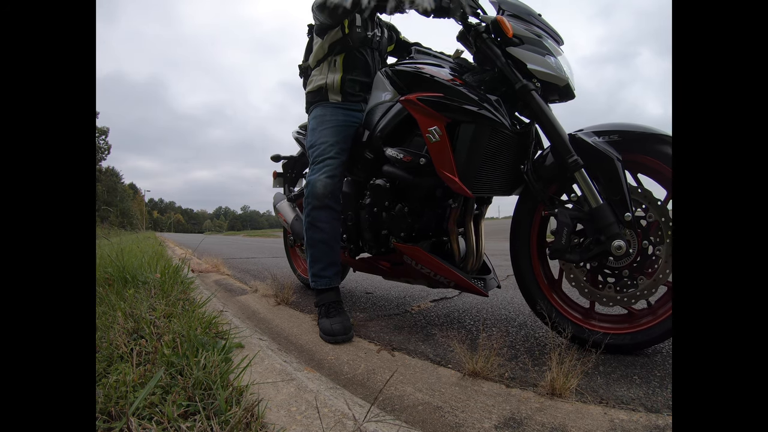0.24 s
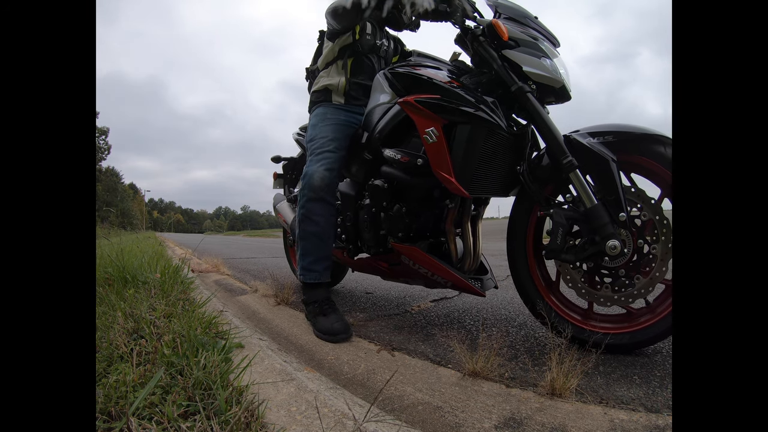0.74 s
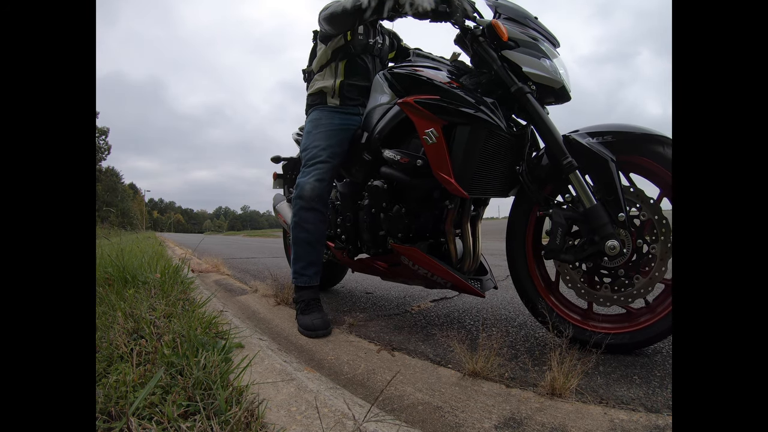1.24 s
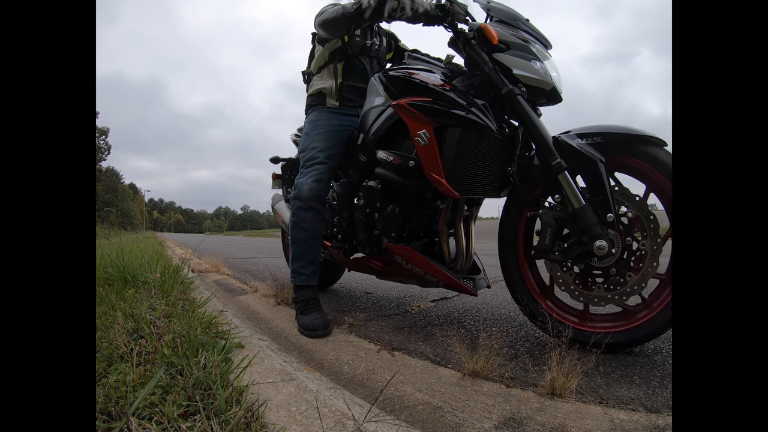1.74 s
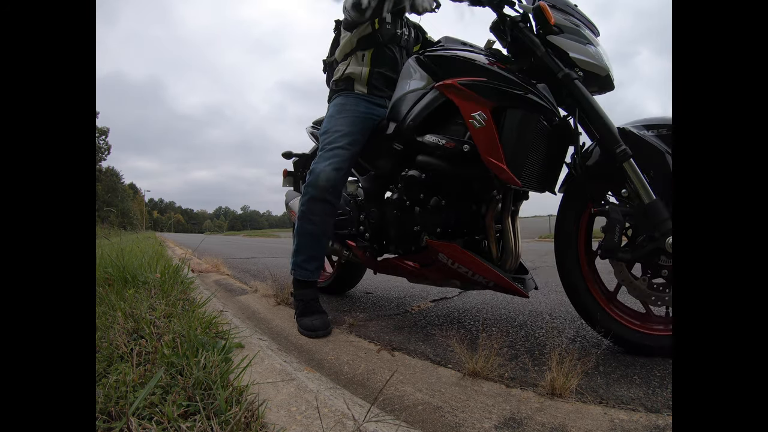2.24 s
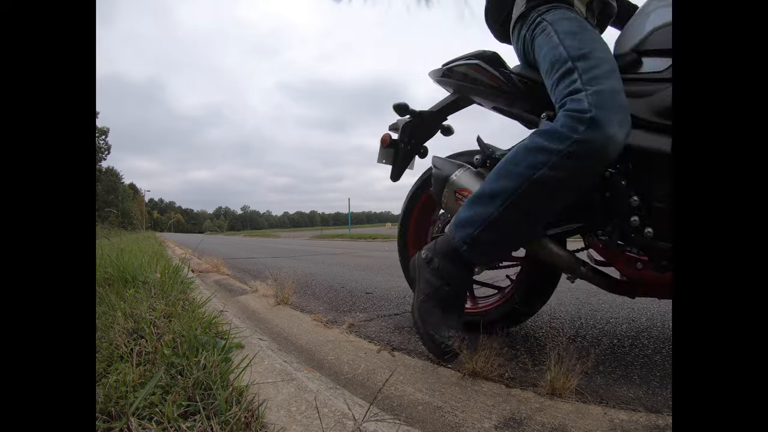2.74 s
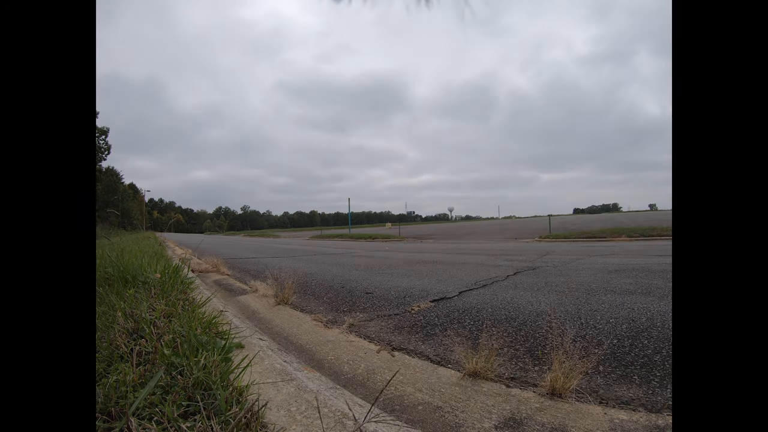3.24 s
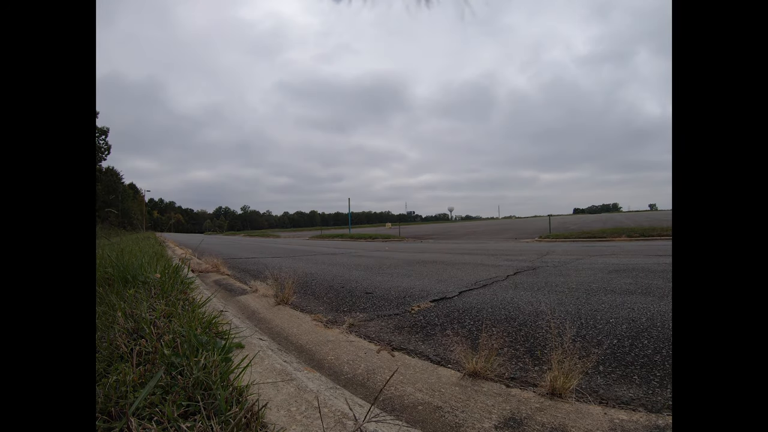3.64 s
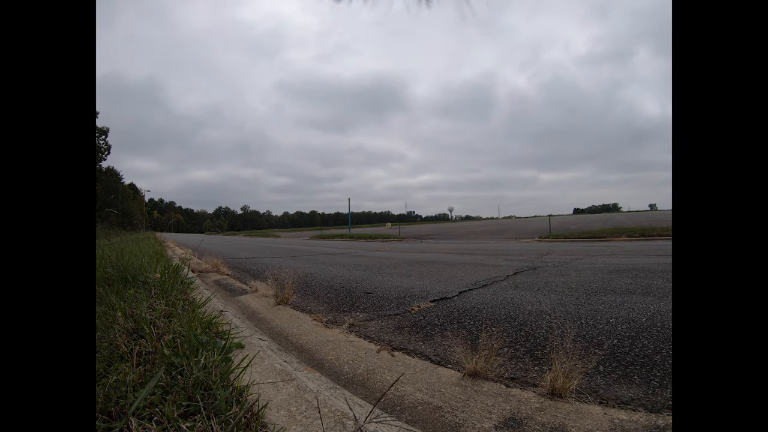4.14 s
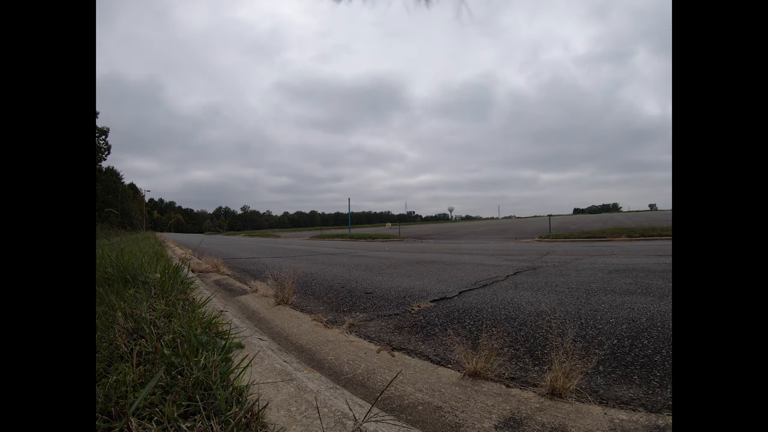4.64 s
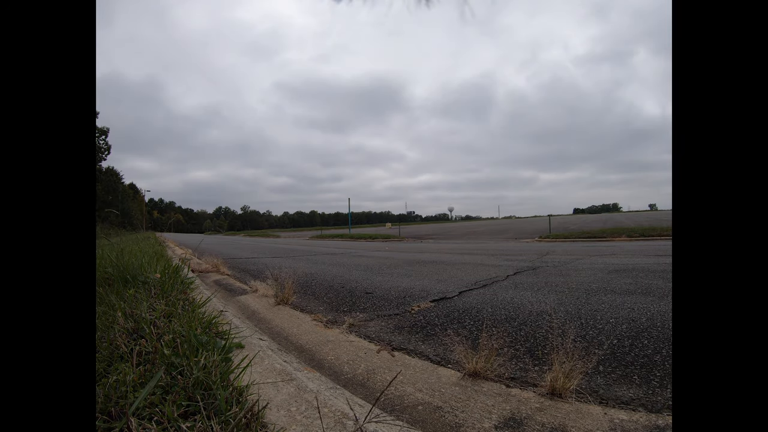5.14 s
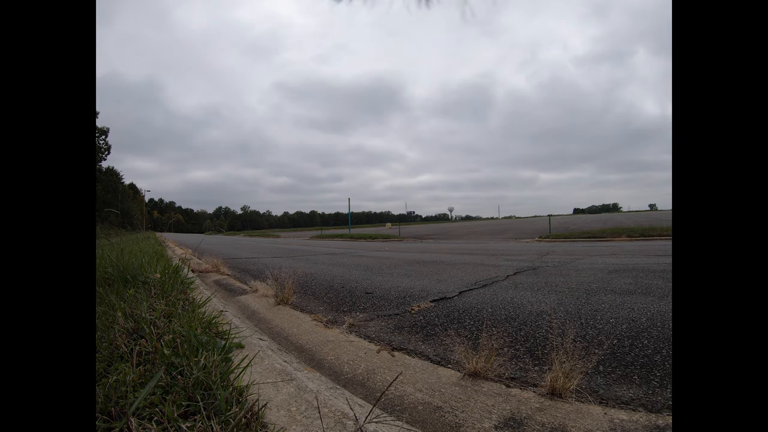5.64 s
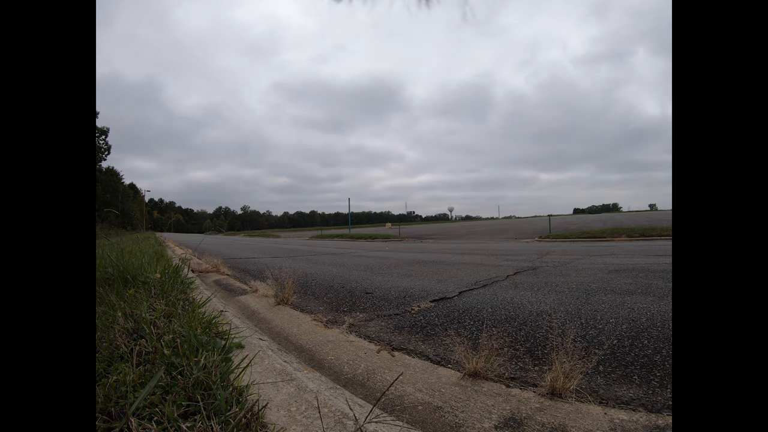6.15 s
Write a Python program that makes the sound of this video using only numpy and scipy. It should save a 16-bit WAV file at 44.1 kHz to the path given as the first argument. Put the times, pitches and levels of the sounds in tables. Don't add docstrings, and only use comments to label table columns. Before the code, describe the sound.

Outdoors beside an open road, a four-cylinder motorcycle idles very close to the microphone. A hard steel clunk drops it into gear, two quick throttle blips bark, and revs sag lumpily. It then growls away past the microphone with rasp and mechanical clatter, suddenly thins, dips in pitch, and climbs again in the distance while wind bumps the microphone.

```python
import sys
import numpy as np
from scipy import signal
from scipy.fft import rfft, irfft, next_fast_len
from scipy.io import wavfile
from scipy.ndimage import map_coordinates

SR = 44100
rng = np.random.default_rng(int(sys.argv[2]) if len(sys.argv) > 2 else 0)


def generate_wav(sig):
    pcm = np.round(np.clip(np.atleast_2d(sig).T, -1, 1) * 32767).astype(np.int16)
    wavfile.write(sys.argv[1], SR, pcm)


def amplitude_ratio(level_db):
    exponent = np.asarray(level_db, float) / 20
    return 10 ** exponent


N = 282620
STEP = 4


def unit(x):
    return x / np.sqrt(np.mean(x ** 2) + 1e-20)


def along(points, hz):
    f, v = np.transpose(points)
    return np.interp(np.log(hz + 1), np.log(f + 1), v)


def curves(rows):
    s, *cols = np.transpose(rows)
    return [np.interp(np.arange(N) / SR, s, c) for c in cols]


def wobble(rate, size=N):
    coarse = np.arange(N // 32 + 1) * 32 / SR
    knots = rng.standard_normal(int(N * rate / SR) + 4)
    smooth = map_coordinates(knots, [coarse * rate], order=2)
    return np.interp(np.arange(size) / size * N / SR, coarse, smooth)


def filtered(x, response):
    m = next_fast_len(N + SR // 2)
    return irfft(rfft(x, m) * response(np.fft.rfftfreq(m, 1 / SR)), m)[:N]


def hiss(response, lo_hz, hi_hz):
    x = filtered(rng.standard_normal(N), response)
    return x / np.std(filtered(x, lambda hz: (hz > lo_hz) & (hz < hi_hz)))


# (t/s, firing rate f/Hz, loudness level/dB, bite of upper orders level/dB, mechanical effort level/dB)
BLIP_STATES = [(0, 40.3, -5, -45.5, -32.5), (.316, 39.97, -4, -44.5, -31), (.36, 64.7, 2, -31, -27),
               (.40, 109.8, 4.5, -19, -31), (.46, 147, -2, -22.5, -29.5), (.548, 124.2, 1, -26, -30),
               (.61, 193.2, 5, -4, -26.5), (.685, 245.7, 1.5, -13, -26), (1.02, 136, -2, -34.5, -33.5)]
RIDE_STATES = [(1.16, 106, -3, -40, -36), (1.34, 76.99, -4, -37.5, -38.5), (1.55, 75, -5, -34, -35),
               (1.68, 82.1, -1, -30.5, -32.5), (1.772, 100.5, 2, -23.5, -34), (1.97, 160.9, -2.5, -17, -26),
               (2.13, 158, 1, -12.5, -26), (2.38, 164.3, 1, -14, -24.5), (2.69, 168.3, 4, -26.5, -29),
               (2.98, 154.2, 2.5, -14, -42), (3.21, 150.5, -6, -24.5, -49),
               (3.63, 143.1, -10.5, -33, -59.5), (3.76, 130.6, -12, -32, -62),
               (4.082, 105.1, -12.5, -37, -64), (4.899, 148, -17, -41.5, -66.5),
               (5.569, 188.2, -15, -35, -64.5), (6.08, 219.7, -17, -30, -64.5), (6.41, 245, -17, -20, -62)]


def engine_state():
    return curves(BLIP_STATES + RIDE_STATES)


LOCKED_S = 4.08


def tug():
    firings_per_turn, slack_s = 26.75, 5.55
    fired = np.cumsum(engine_state()[0]) / SR
    wheel = 2 * np.pi * (fired - fired[round(slack_s * SR)]) / firings_per_turn
    engaged = np.clip(1.5 * (np.arange(N) / SR - LOCKED_S), 0, 1)
    return -(np.cos(wheel) + .35 * np.cos(2 * wheel)) * engaged


def firings():
    tug_hz = 1.9
    return np.cumsum(engine_state()[0] + tug_hz * tug()) / SR + .78


# (start t/s, end t/s)
PASSING_TIMES = (2.65, 3.1)


def turned():
    return np.interp(np.arange(N) / SR, PASSING_TIMES, [0, 1])


# (t/s, delay/ms)
ROAD_BOUNCE = [(1.9, 0.98), (2.4, 0.97), (2.69, 1.544), (2.93, 1.16), (3.3, 1.014), (3.7, 0.97), (5, 1.098),
               (6.41, 0.94)]


def bounce_delay():
    return curves(ROAD_BOUNCE)[0]


# (t/s, peak level/dB, f/Hz)
THROTTLE_SNAPS = [
    (.466, -8, 75),
    (.548, -16, 70),
    (0.684, -17.5, 91.1),
    (1.35, -36, 60.1),
]


def throttle_sign(t):
    snap_s = 0.0073
    return np.prod([np.tanh((t - s) / snap_s) for s, _, _ in THROTTLE_SNAPS], axis=0)


def gulps():
    out, t = np.zeros(N + SR), np.arange(SR // 10) / SR
    for s, db, hz in THROTTLE_SNAPS:
        out[round(s * SR):][:len(t)] += amplitude_ratio(db - 60 * t / 0.035) * np.sin(2 * np.pi * hz * t)
    return out[:N]


# (t/s, level/dB)
WEAK_BURNS = [(1.24, -7), (1.335, -6), (1.445, -12), (1.524, -10)]


def misfire_gain(t):
    return amplitude_ratio(sum(db * np.exp(-((t - s) / .013) ** 2) for s, db in WEAK_BURNS))


# (f/Hz, level/dB)
SILENCER = [(120, -2), (170, 28), (260, 14.5), (380, 10), (460, 0), (560, 4.5), (650, 3.5), (820, -18.5),
            (980, -15), (1170, -21), (1450, -23.5), (2000, -32), (2800, -34.5), (4500, -59)]
# (quarter level/dB, half level/dB, three-quarter level/dB)
PART_ORDERS = [(-62, -38.5, -34.5), (-22, -12, -21.5), (-22.5, -21, -25), (-20, -8, -10.5),
               (-28.5, -13.5, -9)]
# (f/Hz, level/dB)
OPEN_COLOUR = [(40, -24.5), (80, -22), (160, -12), (210, -13), (300, -14), (500, -18.5), (640, -14.5),
               (750, -38)]
# (f/Hz, level/dB)
SHUT_COLOUR = [(80, -25), (140, -8), (240, -8), (290, -19), (440, -23), (510, -33), (620, -16), (720, -19)]
# (f/Hz, level/dB)
BEHIND_COLOUR = [(100, -14), (150, -15), (220, -15), (300, -15), (400, -16), (500, -18.5), (700, -23)]
# (firing rate f/Hz, level/dB)
IMBALANCE = [(40, -4.5), (77, -4.5), (110, -4.4), (165, -1.7), (240, -6.5)]


def exhaust():
    rate_hz, loud_db, upper_db, _ = [c[::STEP] for c in engine_state()]
    size = len(rate_hz)
    t = np.arange(size) * STEP / SR
    throttle = throttle_sign(t)
    shut, behind, delay_ms = (1 - throttle) / 2, turned()[::STEP], bounce_delay()[::STEP]
    upper_db = upper_db - 7 * shut
    colour_shift = delay_ms ** -0.82

    lumpy = (1 - shut) * np.exp(-((rate_hz - 78) / 5) ** 2)
    scatter_db, limp = .6 + 1.1 * lumpy, .26 * lumpy
    surge = np.clip(np.gradient(rate_hz, t) / 900, 0, 1) ** 2
    uneven_db = along(IMBALANCE, rate_hz) + 6 * surge
    loud_db = loud_db + 1.2 * tug()[::STEP]
    boom_db = 11 * np.clip((93 - rate_hz) / 40, 0, 1)
    bite_db = (rasp_level()[::STEP] - upper_db + 13) * .7 + 9 * surge

    def bounce_db(hz):
        share = 0.53
        interference = 2 * share * np.cos(2 * np.pi * hz * delay_ms / 1000)
        return 10 * np.log10(1 + share ** 2 + interference)

    def beside_db(hz):
        rounded_db = 6.5 * (hz / rate_hz - 1)
        return shut * (along(SHUT_COLOUR, hz) - rounded_db) + (1 - shut) * along(OPEN_COLOUR, hz)

    def lower_level(hz):
        colour_db = (1 - behind) * beside_db(hz) + behind * along(BEHIND_COLOUR, hz)
        return loud_db + colour_db + (1 - shut) * bounce_db(hz) - 3

    def upper_level(hz):
        bite = bite_db * np.clip((hz - 800) / 400, 0, 1)
        boom = boom_db * np.clip((400 - hz) / 130, 0, 1)
        return upper_db - 7.5 + along(SILENCER, colour_shift * hz) + bite + boom

    def level(order):
        return lower_level(max(order, 1) * rate_hz) if order < 4 else upper_level(order * rate_hz)

    fired = firings()[::STEP]
    luck = rng.standard_normal((int(fired[-1]) + 3, 2))
    strength, late = [map_coordinates(column, [fired], order=1) for column in luck.T]
    turn = 2 * np.pi * (fired + 0.015 * scatter_db * late)

    out, above = np.zeros(size), level(0)
    for k in range(18):
        below, above = above, level(k + 1)
        hz = (k + 1) * rate_hz
        lag = 0.29 * np.arctan((hz - 170) / 120) - 2 * np.pi * 0.002655 * np.maximum(hz - 310, 0)
        flutter_db = np.minimum((hz / 330) ** 1.5, 3.5 + 1.5 * behind) * wobble(6, size)
        burn_db = min(0.32 + 0.33 * k, 1.2) * scatter_db * strength
        out += amplitude_ratio(above + flutter_db + burn_db) * np.cos((k + 1) * turn - lag)
        for quarter, part_db in enumerate(PART_ORDERS[min(k, 4)] if k < 13 else []):
            drift = rng.uniform(0, 2 * np.pi) + .5 * wobble(3.32, size)
            swell_db = uneven_db + 2.1 * wobble(4.83, size)
            part = np.cos((k + (quarter + 1) / 4) * turn - drift)
            out += amplitude_ratio((below + above) / 2 + part_db + swell_db) * part

    push = np.clip(1.5 * throttle, -1, 1)
    push = push * (1 + limp * np.cos(turn / 2))
    push = push * misfire_gain(t)
    return signal.resample_poly(np.sqrt(2) * out * push, STEP, 1)[:N]


def rasp_level():
    rate_hz, _, _, effort_db = engine_state()
    behind_db = 11 + 11.5 * np.log2(rate_hz / 145)
    return effort_db + 0.83 + turned() * behind_db


# (f/Hz, density level/dB per Hz)
RASP_COLOUR = [(60, -63), (150, -22), (400, -3.5), (750, -2), (1100, -12), (1800, -8.5), (3000, -26),
               (6000, -22.5)]


def gas_rasp():
    def colour(hz):
        high_pass = hz ** 4 / (hz ** 4 + 150 ** 4)
        return amplitude_ratio(along(RASP_COLOUR, hz)) * high_pass / (1 + (hz / 9000) ** 4)

    puffs = unit(1 + 0.19 * np.cos(2 * np.pi * firings()))
    return amplitude_ratio(rasp_level() - 7 + 0.7 * wobble(17)) * hiss(colour, 686, 3000) * puffs


# (f/Hz, density level/dB per Hz)
CLATTER_COLOUR = [(590, -34), (1000, -16), (1320, 1.5), (1500, -6.5), (2070, -5.5), (2550, -4),
                  (5650, -12.5), (7290, -16), (8870, -15.5), (15800, -30)]
# (f/Hz, width/Hz, level/dB)
CASE_MODES = [(1415, 24, 7.5), (2210, 160, 3), (3590, 120, 4.5), (5700, 900, 5), (8660, 120, 10),
              (9200, 130, 3)]
# (teeth per firing, level/dB)
GEAR_MESHES = [(6.2, -19), (8.5, -15), (11.5, -18), (13, -18), (21.5, -10)]


def clatter():
    def cases(hz):
        modes = sum((amplitude_ratio(db) - 1) / (1 + (2 * (hz - c) / w) ** 2) for c, w, db in CASE_MODES)
        return amplitude_ratio(along(CLATTER_COLOUR, hz)) * (1 + modes)

    near = hiss(cases, 2780, 8600)
    far = hiss(lambda hz: cases(hz) / (1 + (hz / 7000) ** 6), 2500, 9000)
    fired = firings()
    tick_db_scale = 0.72 * np.cos(4 * np.pi * fired - 1.1)
    ticks = unit(amplitude_ratio(tick_db_scale + 0.76 * wobble(150) + 0.54 * wobble(23.14)))
    gears = np.zeros(N)
    for teeth, db in GEAR_MESHES:
        mesh = np.sin(2 * np.pi * teeth * fired + 1.26 * wobble(40))
        gears += amplitude_ratio(db + 3.5 * wobble(6.6)) * mesh
    away = turned() * np.pi / 2
    sound = ticks * (np.cos(away) * (near + gears) + np.sin(away) * far)
    return amplitude_ratio(engine_state()[3] - 2.1) * sound


def off_road(x):
    share = 0.2
    late = np.arange(N) - bounce_delay() * SR / 1000
    return (x + share * np.interp(late, np.arange(N), x)) / np.hypot(1, share)


# (t/s, peak level/dB, ring f/Hz, T60/s)
GEAR_IMPACTS = [(0.0762, -14.5, 2020, 0.05), (0.0944, -3, 2420, 0.047), (0.1265, -13, 2510, 0.048),
                (0.139, -5, 1540, 0.047), (0.1448, -13.5, 2020, 0.033), (0.245, -15, 1720, 0.037),
                (0.3444, -13, 2324, 0.026)]


def gear_clunk():
    out, t = np.zeros(N + SR), np.arange(SR // 10) / SR
    for s, db, ring_hz, t60 in GEAR_IMPACTS:
        b, a = signal.iirpeak(ring_hz, 3.5, SR)
        grit = rng.standard_normal(len(t))
        rattle = unit(signal.lfilter(b, a, grit)) + 1.74 * signal.lfilter([1 - .68], [1, -.68], grit)
        decay = amplitude_ratio(db - 12.0 - 60 * np.maximum(t - .003, 0) / t60)
        onset = 1 - np.exp(-t / 0.00022)
        out[round(s * SR):][:len(t)] += decay * onset * rattle
    return out[:N]


# (multiple of link rate, level/dB)
CHAIN_OVERTONES = [(2, 4), (3, 4.5), (4, 3.5), (5, -6), (6, -6), (7, -11)]


def chain_whine():
    clutch_s, links_per_firing, slip = 3.5, 3.76, 0.42
    t = np.arange(N) / SR
    taken = np.clip((t - clutch_s) / (LOCKED_S - clutch_s), 0, 1)
    db = -73 - 12 * (1 - taken) ** 2 - 10 * np.maximum(t - 4.9, 0)
    grip = slip + (1 - slip) * taken ** 1.3
    turn = 2 * np.pi * np.cumsum(links_per_firing * grip * np.gradient(firings()))
    stack = np.zeros(N)
    for multiple, link_db in CHAIN_OVERTONES:
        tone = np.sin(multiple * turn + 0.89 * wobble(35))
        stack += amplitude_ratio(4 * wobble(8) + link_db) * tone
    return amplitude_ratio(db) * (taken > 0) * stack


# (f/Hz, T60/s)
VERGE_DECAY = [(100, 0.89), (600, 0.23), (2000, 0.25), (8000, 0.08)]


def verge(x):
    hz, t, z = signal.stft(rng.standard_normal(SR // 2), SR, nperseg=256)
    decay = amplitude_ratio(-60 * t / along(VERGE_DECAY, hz)[:, None])
    tail = signal.istft(z * decay, SR, nperseg=256)[1]
    delayed = np.pad(x, (1300, 0))
    return signal.fftconvolve(delayed, tail / np.linalg.norm(tail))[:N]


# (t/s, level/dB, length/s, push 1 or pull -1)
GUSTS = [(4.11, -33, .025, -1), (4.31, -21.5, .055, -1), (4.45, -17.5, .04, 1), (4.568, -28, .015, -1),
         (4.655, -19, .045, 1), (4.714, -16, .02, -1), (4.78, -29, .035, 1), (4.86, -31, .02, -1),
         (5.014, -21.5, .047, -1), (5.27, -27, .06, 1), (5.405, -31, .045, -1), (5.578, -28, .03, 1),
         (5.634, -29, .022, -1), (5.72, -24, .03, -1), (5.83, -23, .065, 1), (6.025, -29, .08, -1)]
# (f/Hz, density level/dB per Hz)
BUFFET_COLOUR = [(6, 19), (14, 22), (22, -7), (32, -18), (60, -25), (120, -33), (300, -66)]


def wind():
    gusts = sum(way * amplitude_ratio(db) * np.exp(-((t_axis() - s) / length) ** 2) for s, db, length, way in GUSTS)
    rumble = hiss(lambda hz: amplitude_ratio(along(BUFFET_COLOUR, hz)) * (hz > 16), 16, 60)
    return gusts + (amplitude_ratio(-50) + amplitude_ratio(-20) * np.abs(gusts)) * rumble


def t_axis():
    return np.arange(N) / SR


# (f/Hz, density level/dB per Hz)
FIELD_COLOUR = [(530, -16), (900, 6.5), (1040, 0.5), (1400, -16), (1680, -0.5), (1960, -31.5), (3320, -10),
                (4080, -32), (6130, -19), (8370, -25), (9210, -15.5), (15100, -45), (15800, -35)]


def grass():
    field = hiss(lambda hz: amplitude_ratio(along(FIELD_COLOUR, hz)) / (1 + (hz / 10500) ** 8), 2500, 15800)
    return field * amplitude_ratio(-67.5 - 1.5 + .7 * wobble(4.5))


def insects():
    t, drop_s = t_axis(), 5.1
    song_db = np.where(t < drop_s, -59.5 - 4 * (t - 3.4), -81)
    band = hiss(lambda hz: 1 / (1 + ((hz - 6300) / 450) ** 4), 5900, 6700)
    return band * amplitude_ratio(song_db - 7.0 + 0.9 * wobble(11.0))


# (f/Hz, density level/dB per Hz)
TRAFFIC_COLOUR = [(20, -7), (40, 1), (100, 1), (200, 2), (500, -35.5)]


def traffic():
    return hiss(lambda hz: amplitude_ratio(along(TRAFFIC_COLOUR, hz)), 20, 500) * amplitude_ratio(-52 + 1.7 * wobble(1.0))


def scene():
    engine_noise = off_road(gas_rasp() + clatter())
    machine = exhaust() + gulps() + engine_noise + gear_clunk() + chain_whine()
    outdoors = wind() + grass() + insects() + traffic()
    return (machine + amplitude_ratio(-24.0) * verge(machine) + outdoors)[None]


def band_limit(x):
    return signal.sosfilt(signal.butter(12, 16310, fs=SR, output="sos"), x)


def record(dry):
    top = .94
    loud = dry[0] / (1 + np.abs(dry[0] / top) ** 8) ** (1 / 8)
    mix = filtered(loud, lambda hz: hz < 15830)[None]
    return band_limit(mix)


dry = scene()
out = record(dry)
generate_wav(out)
```